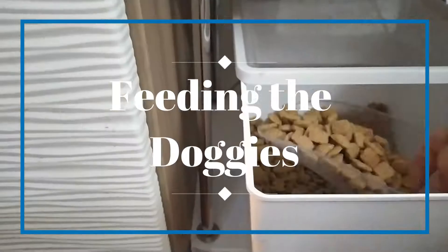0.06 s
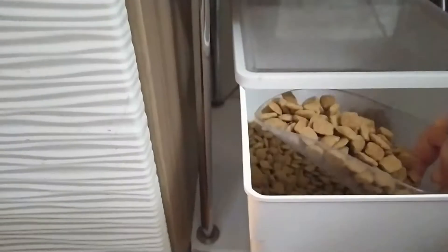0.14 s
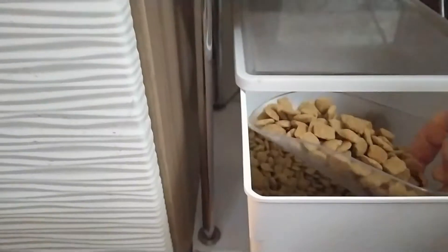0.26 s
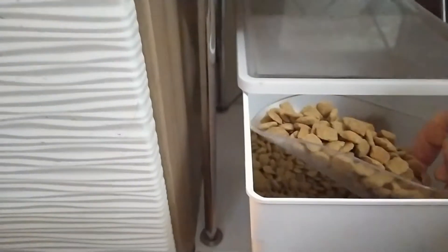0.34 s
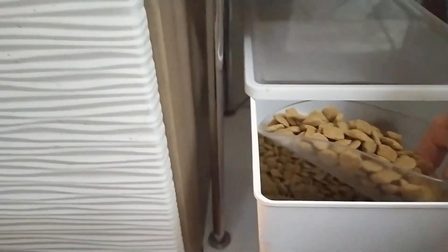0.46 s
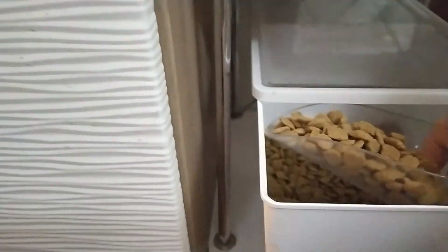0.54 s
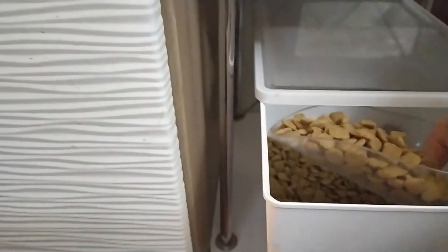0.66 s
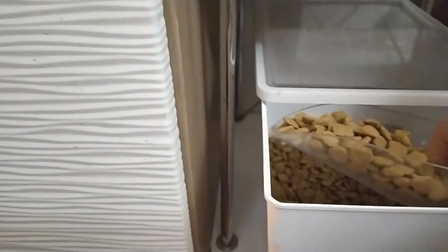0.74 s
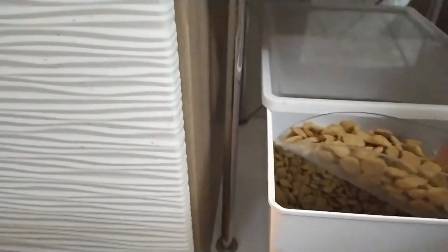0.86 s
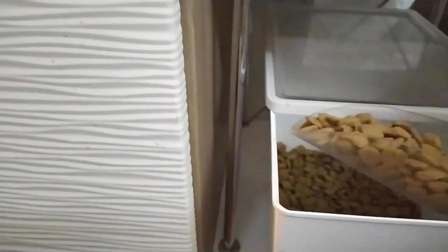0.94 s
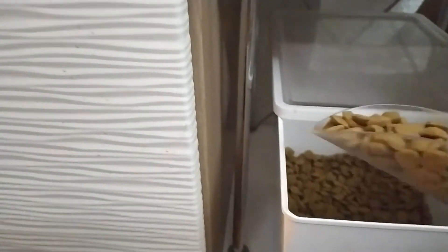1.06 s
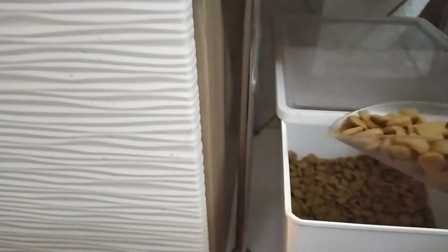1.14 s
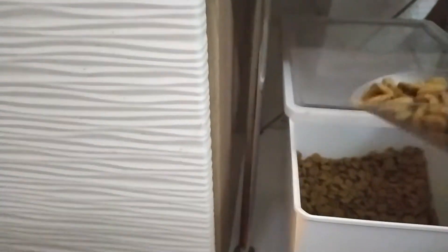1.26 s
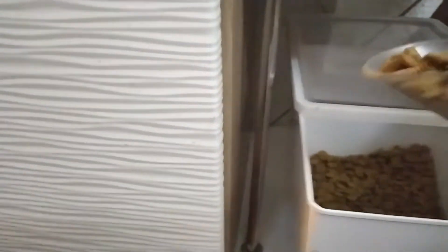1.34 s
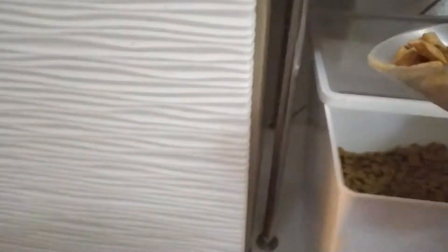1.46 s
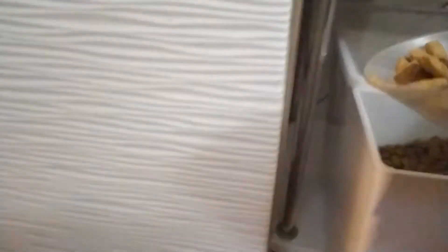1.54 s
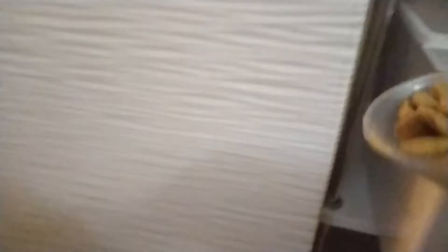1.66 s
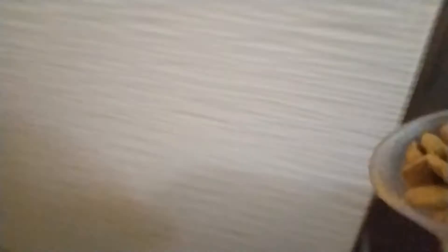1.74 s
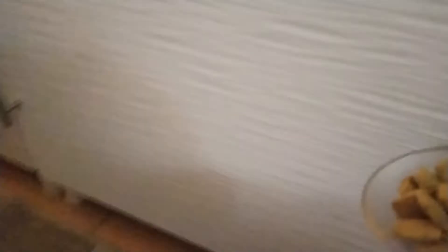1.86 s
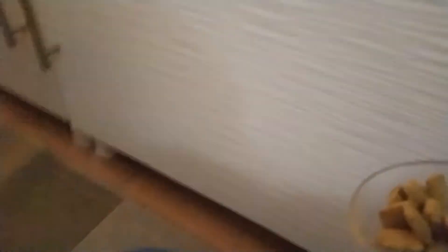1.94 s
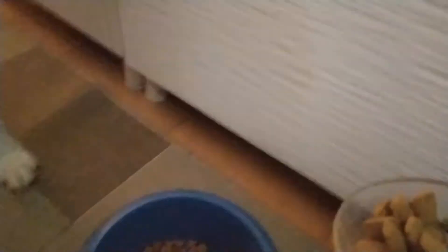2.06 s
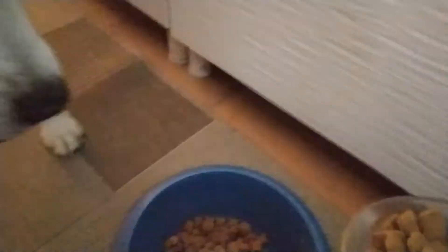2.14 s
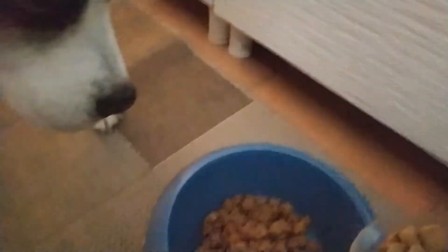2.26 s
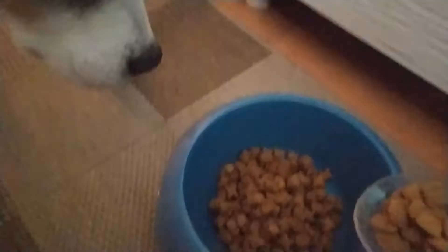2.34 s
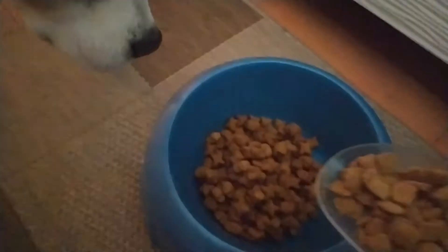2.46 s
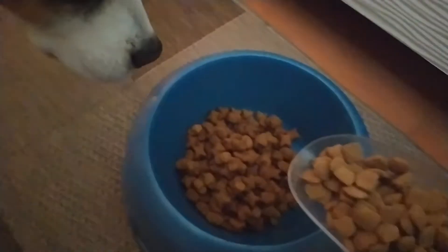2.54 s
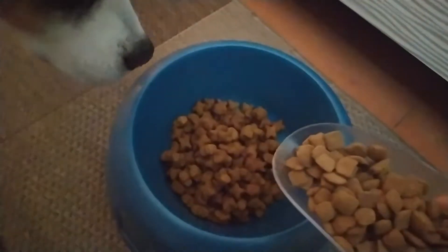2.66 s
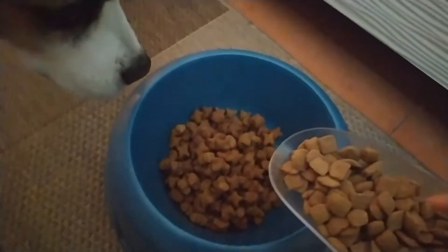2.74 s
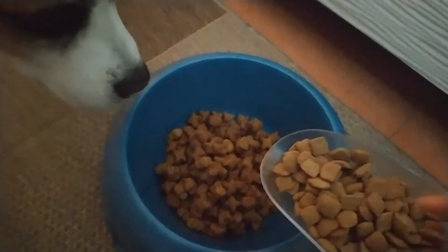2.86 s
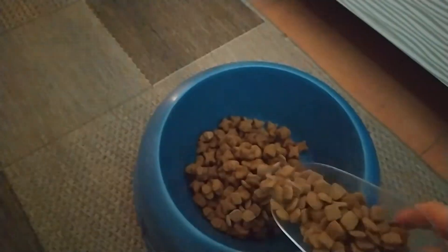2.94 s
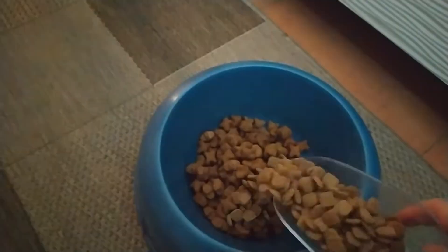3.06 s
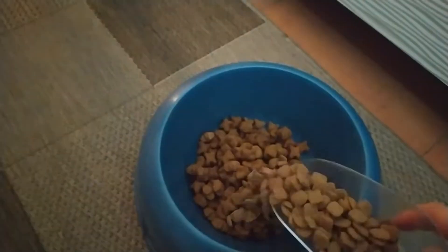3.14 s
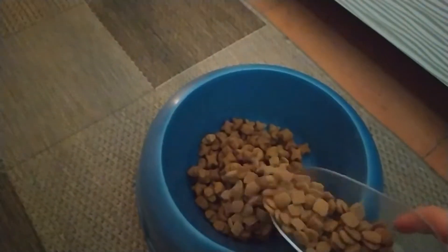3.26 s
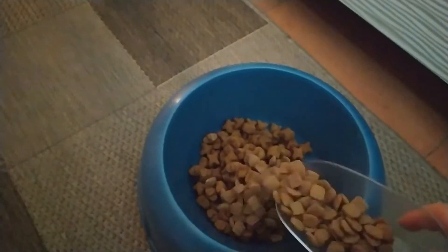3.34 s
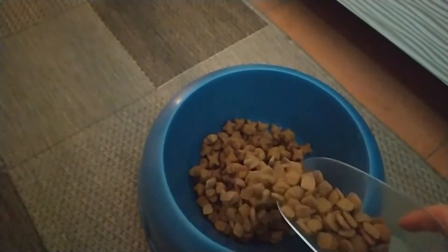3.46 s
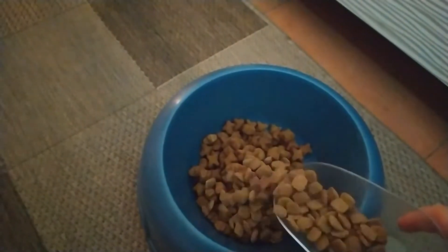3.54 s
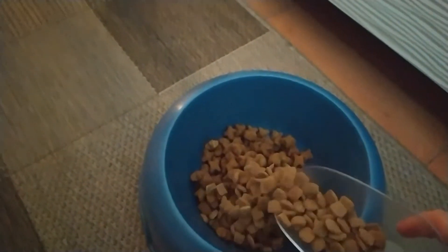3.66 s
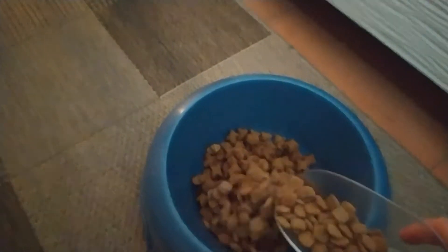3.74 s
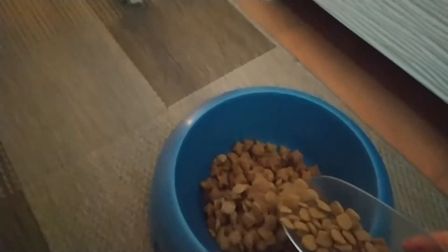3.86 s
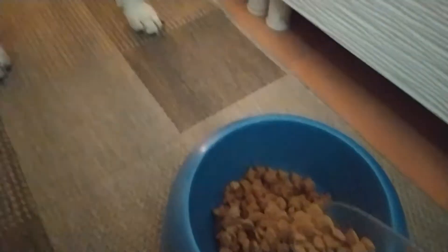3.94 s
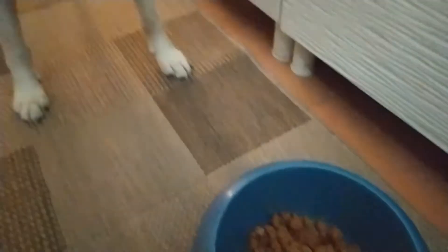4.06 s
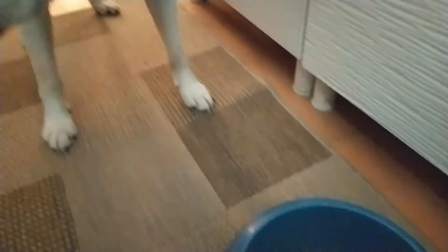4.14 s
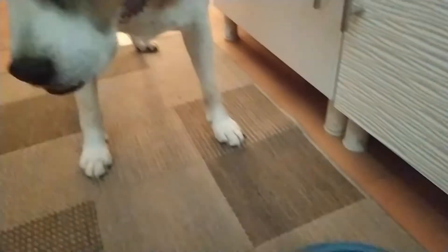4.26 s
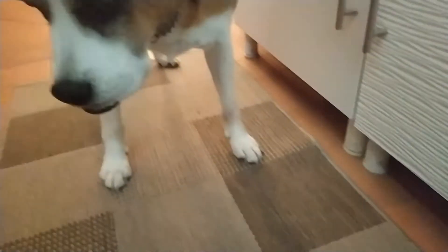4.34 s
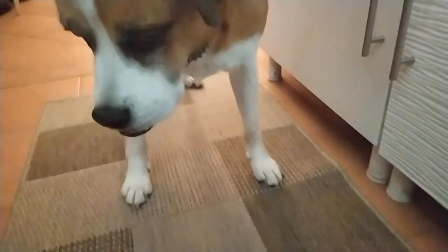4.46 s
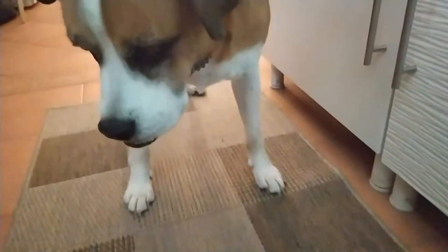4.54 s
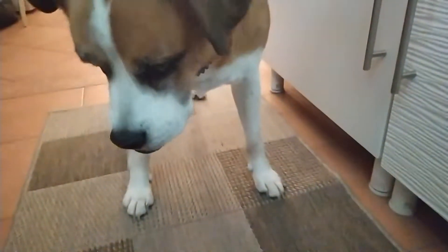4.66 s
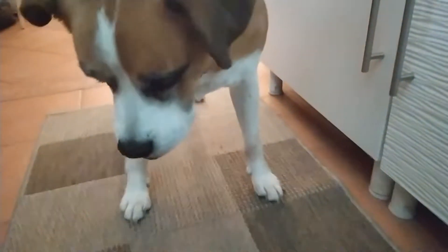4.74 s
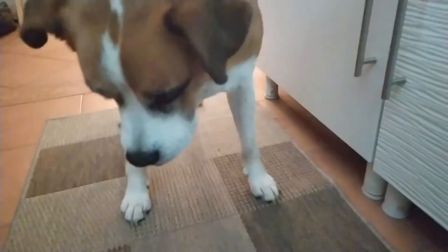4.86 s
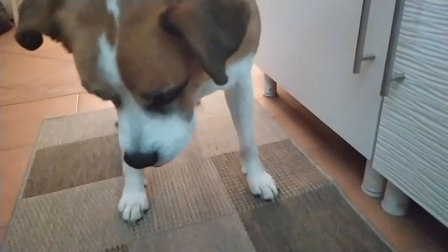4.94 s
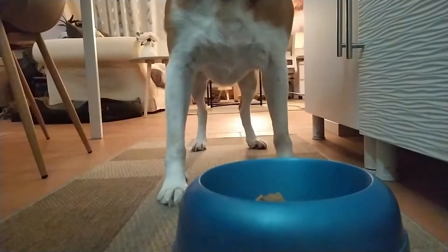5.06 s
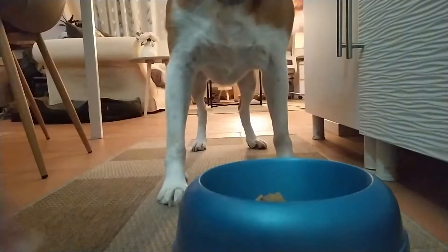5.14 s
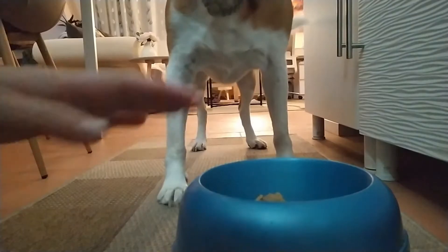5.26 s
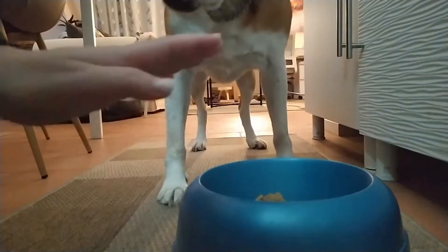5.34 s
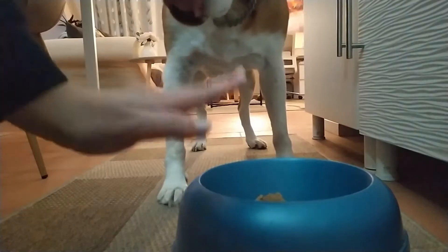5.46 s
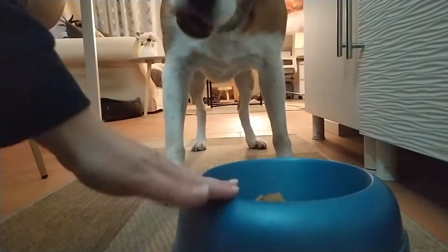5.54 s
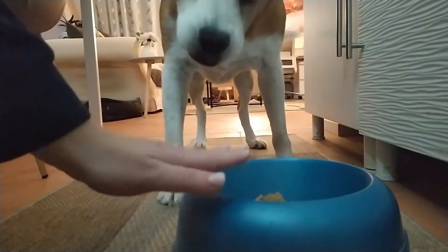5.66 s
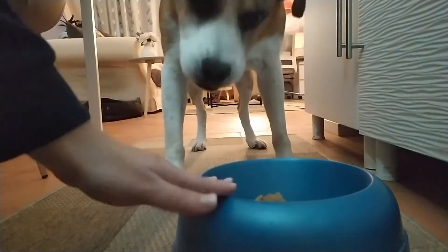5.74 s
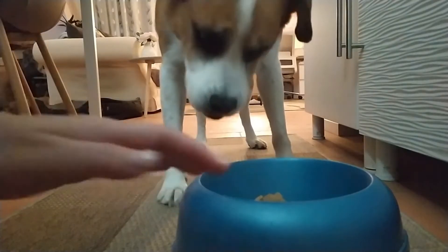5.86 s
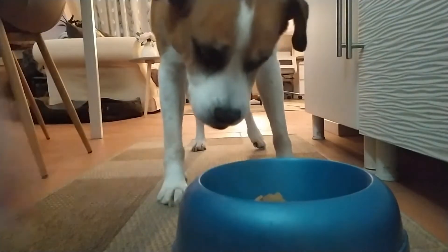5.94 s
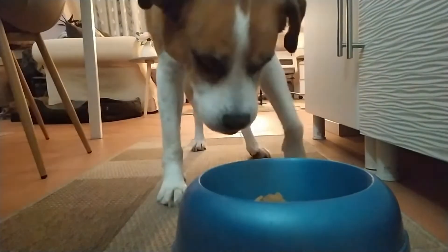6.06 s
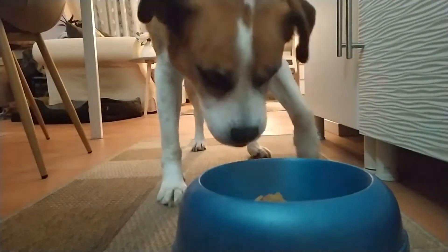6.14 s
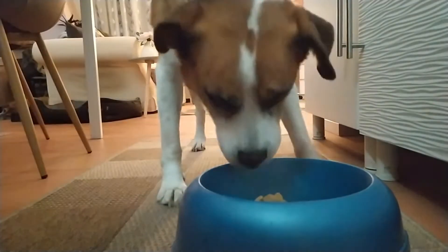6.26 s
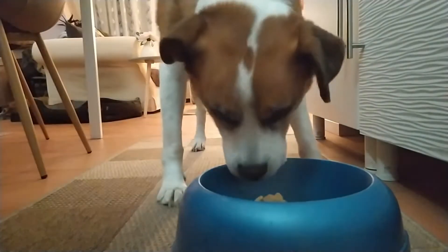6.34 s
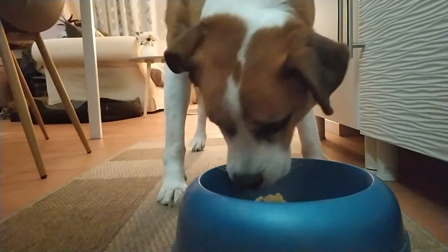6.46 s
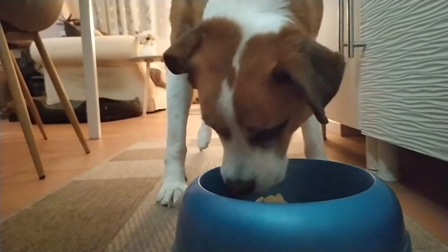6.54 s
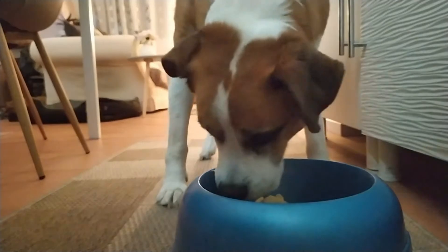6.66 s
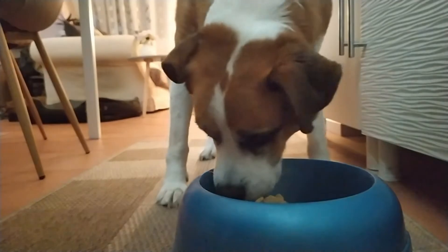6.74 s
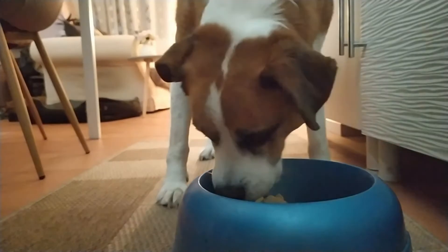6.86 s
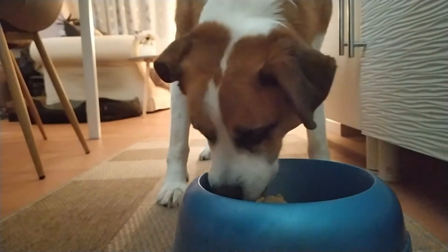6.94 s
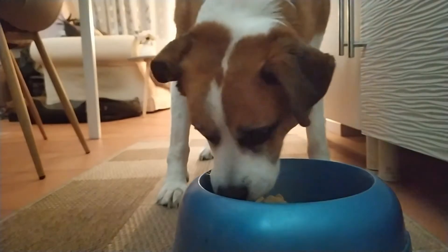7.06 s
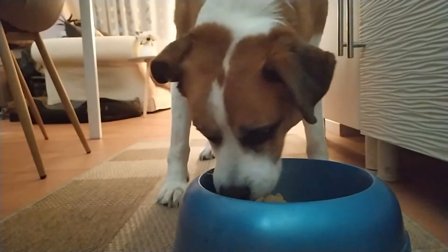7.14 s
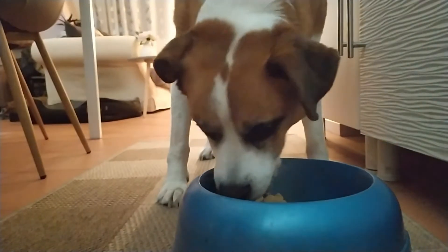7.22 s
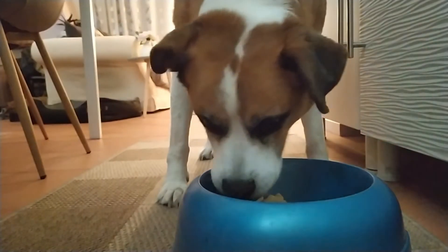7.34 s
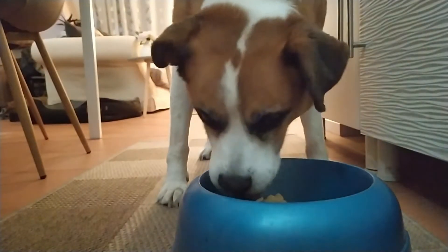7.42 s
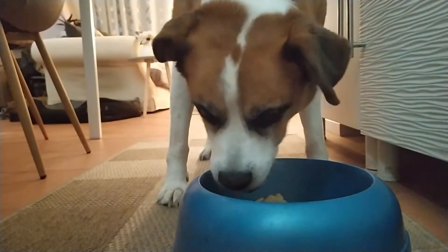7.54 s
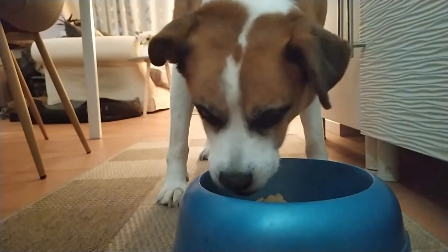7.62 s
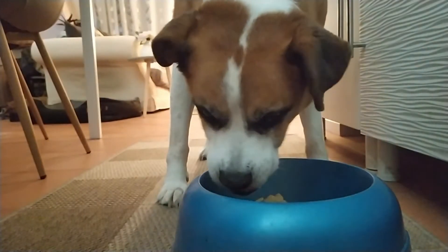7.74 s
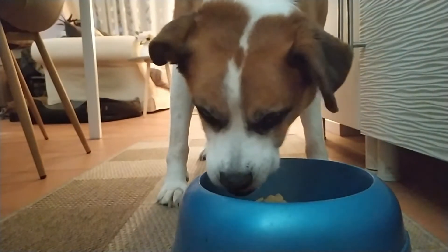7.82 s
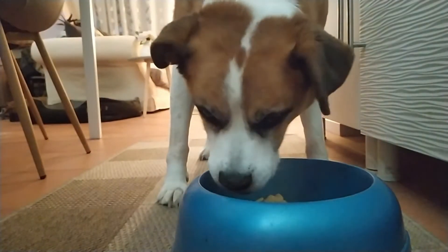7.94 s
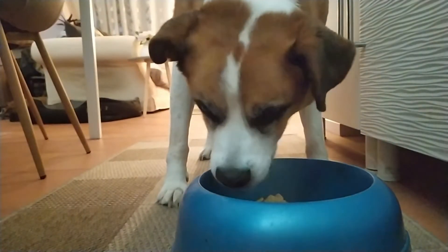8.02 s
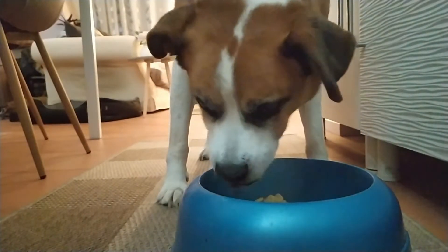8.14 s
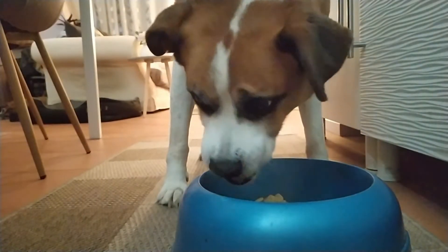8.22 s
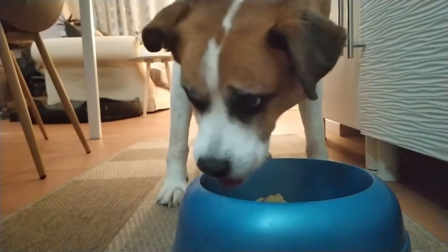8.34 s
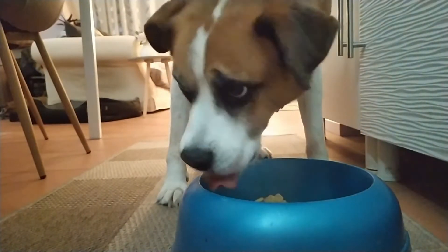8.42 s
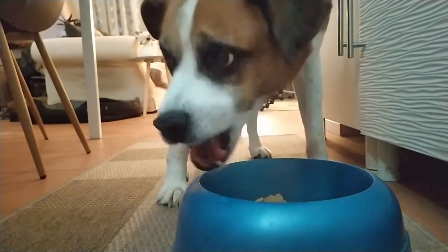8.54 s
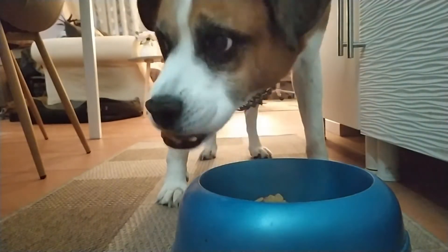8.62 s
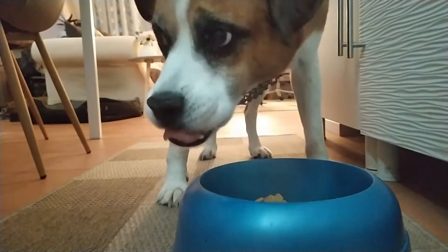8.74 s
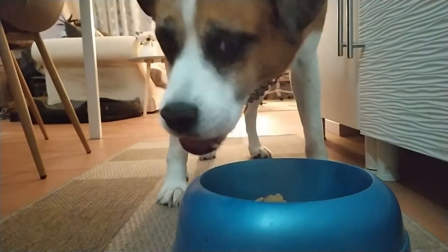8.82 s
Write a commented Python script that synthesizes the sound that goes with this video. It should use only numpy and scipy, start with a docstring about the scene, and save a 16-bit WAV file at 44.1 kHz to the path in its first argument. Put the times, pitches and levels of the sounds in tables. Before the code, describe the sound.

A quiet small kitchen, heard closely in stereo, with faint air and a low mains hum. From 0 to 0.4 s a hollow plastic bin judders, groans and thumps, with hard clacks near 0.15 and 0.3; softer knocks follow, then a scrape, low groan and firm double thud around 0.95, ending by 1.1. Faint rubbing and shifting pieces lead to a crisp double tick on the rim at 2.73. From 3.0 to 4.0 dry kibble slides and clicks in irregular bursts, bright scoop rattle over dull landings, last stray pieces by 4.2. Near quiet, slight rustles around 5. Two hollow bowl pats at 5.64 and 5.8, the second louder. A short whistling sniff at 6.1, muzzle bumps at 6.55, then licking, smacks and brittle crunches, strongest at 7.1 and 7.83, with a tiny collar clink at 7.1. Sparse chewing and small ticks fade toward 8.8.

```python
"""Dry kibble is tipped from a scoop into a plastic bowl and eaten by a dog: bursts of micro-impacts excite each body.
Before the pour, the scoop knocks about in a hollow plastic bin, a set of decaying modes struck and rubbed.
After it, a hand pats the bowl twice, in modal synthesis again; the dog sniffs in filtered noise,
then noses, licks and crunches in bursts, ringing tones and a patter of pellets.
Friction noise, collar clinks, faint room air and a mains hum complete the small kitchen, heard from a hand-held camera."""
import sys
import numpy as np
from scipy import signal
from scipy.fft import rfft, irfft, next_fast_len
from scipy.io import wavfile
from scipy.ndimage import uniform_filter1d

SR = 44100
rng = np.random.default_rng(int(sys.argv[2]) if len(sys.argv) > 2 else 0)


def master_out(mix):
    """Clip the mix to full scale and print it as 16-bit PCM to the path in sys.argv[1]."""
    frames = np.transpose(np.atleast_2d(mix))
    ceiling = np.clip(frames, -1, 1)
    pcm = np.round(ceiling * 32767).astype(np.int16)
    wavfile.write(sys.argv[1], SR, pcm)


N = 392049  # samples

# room air spectrum: frequency_hz, level_db (per Hz)
FLOOR = [(20, -19.5), (40, -8.5), (60, 5), (110, -4.5), (170, -8.5), (400, -10), (750, -15), (1300, -18.5),
         (2500, -22), (8000, -21), (16000, -24.5)]
FLOOR_DB = -68
# partials of the hum: pitch_hz, level_db
HUM = [(49, -69), (98, -78), (147, -100)]
# decay of the room: frequency_hz, t60_s
ROOM = [(100, 0.41), (320, 0.48), (600, 0.36), (1200, 0.38), (3000, 0.33), (8000, 0.27), (13000, 0.33),
        (16000, 0.26)]
# likeness of the two microphone ports: frequency_hz, coherence (0 to 1)
COHERENCE = [(100, 0.83), (500, 0.75), (1100, 0.26), (3000, 0.11), (16000, 0.084)]
# tilt between the ports: frequency_hz, left_minus_right_db
BALANCE = [(100, 1), (700, 0), (1500, 1), (5000, 0.5), (12000, 2.5)]
EDGE_HZ = 16200  # upper band limit

# scoop, sleeve and muzzle rubbing: start_s, end_s, level_db, fade_s
RUBS = [(0.0, 0.11, -61.5, 0.083), (.3, 2.5, -72, .12), (.88, 0.95, -58.5, 0.022),
        (1.41, 1.455, -64, 0.022), (1.9, 2.25, -72, 0.13), (2.03, 2.075, -65, .02), (2.15, 2.2, -64, .03),
        (4.91, 5.05, -66, 0.03), (5.37, 5.41, -67, .025), (5.56, 5.62, -63.5, .03), (5.3, 8.88, -69, 0.15),
        (6.55, 8.42, -68.5, 0.08), (8.6, 8.64, -66, .025), (8.76, 8.88, -73, .05)]
# friction spectrum: frequency_hz, level_db (per Hz)
RUB = [(100, 1.5), (700, 0), (1500, -1), (3000, -0.5), (5000, 0.5), (9000, 5), (12000, 1), (16000, -10)]
# hollow resonance of a cavity: frequency_hz, level_db (per Hz)
CAVITY = [(100, -45.5), (380, -15.5), (590, -4), (760, 0.5), (950, -11), (1300, -15.5), (2500, -25.5),
          (16000, -18)]
# hollow rustle on the way to the bowl: start_s, end_s
CARRY_SPAN_S = (2.05, 2.3)
CARRY_DB, CARRY_RISE_S, CARRY_FALL_S = -68.5, 0.33, 0.18
# pieces shifting in the carried scoop: start_s, level_db, brightness_db
SHIFTS = [(1.648, -62, -3), (1.708, -69, -5), (2.178, -57.5, -20), (2.305, -64, -6)]
SHIFT_S = 0.0026

# clinks of the collar: start_s, level_db, pitch_hz
CLINKS = [(2.014, -60, 7640), (5.719, -59, 6900), (7.103, -43, 9650), (7.968, -59, 7600)]
CLINK_T60_S = 0.026

# the sniff over the bowl: start_s, end_s
SNIFF_SPAN_S = (6.11, 6.18)
SNIFF_DB, SNIFF_RISE_S, SNIFF_FALL_S = -57, 0.083, 0.027
HISS_DB, HISS_LAG_S = -59.5, 0.041
# spectra of the nostril whistle and the hiss above it: frequency_hz, level_db (per Hz)
NOSTRILS = [(300, -26), (800, -15), (1300, -11), (1550, -32), (1970, -10), (2200, -27), (2500, -1),
            (2780, -2), (3000, -12), (3260, -23), (3550, -8), (4700, -4.5), (5250, -15), (6000, -3.5),
            (6800, -16), (16000, -42)]
NOSE_HISS = [(3000, -40), (6700, -18), (7300, 3), (8500, -6), (9400, -9), (11000, -3), (12800, -5),
             (16000, -12)]

# smacks of tongue and lips: start_s, level_db, pitch_hz (of the mouth), length_s
SMACKS = [(6.83, -56.5, 650, .007), (7.056, -52.5, 784, 0.0064), (7.28, -59, 774, 0.0087),
          (7.321, -53.5, 810, 0.0084), (7.353, -57, 710, 0.0046), (7.481, -60, 530, 0.0047),
          (7.595, -61, 755, 0.0069), (7.64, -60, 830, .008), (7.679, -58, 660, 0.0049),
          (7.762, -52, 740, 0.0037), (7.831, -37, 603, 0.0034), (7.9, -51, 530, 0.0094),
          (8.24, -60.5, 730, 0.012), (8.272, -60, 746, .007), (8.583, -51.5, 592, 0.0043),
          (8.6305, -50, 1030, 0.00091)]
# the tongue works in the bowl: start_s, end_s
LAP_SPAN_S = (7.08, 8.05)
LAP_DB, LAP_RISE_S, LAP_FALL_S = -67.5, 0.43, 0.15
# the muzzle bumps the bowl: start_s, level_db, length_s
BUMPS = [(6.533, -45, 0.0038), (6.568, -44, 0.01), (7.307, -53.5, .01), (7.357, -52.5, 0.0067),
         (7.461, -56.5, .006), (7.597, -54, 0.0036), (7.682, -60.5, 0.0063), (7.828, -51.5, 0.0052),
         (8.022, -52, 0.014)]
# kibble cracks between the teeth: start_s, level_db, brightness_db, length_s
CRUNCHES = [(6.309, -55, -14, 0.0068), (6.566, -52, 1, 0.022), (6.597, -59.5, 4, 0.018),
            (6.873, -57.5, -2, 0.008), (7.101, -39, 2.5, 0.0035), (7.18, -48, -24, 0.0028),
            (7.326, -62, -15, 0.0066), (7.352, -56, -14, 0.005), (7.38, -63, -9, 0.005),
            (7.42, -46, -36, .0025), (7.443, -56, -24, 0.0037), (7.591, -54.5, -16, 0.0036),
            (7.685, -58.5, -9, 0.0022), (7.764, -48, -3.5, 0.0028), (7.833, -40.5, -5, 0.0028),
            (7.846, -47, -21, 0.003), (7.9, -46, -8, 0.0044), (7.908, -49.5, 4, 0.0026),
            (8.269, -58, 1, 0.006), (8.407, -57.5, 5.5, 0.0063), (8.622, -56.5, 0, 0.0049),
            (8.63, -55, -10, 0.0023)]
CRUMBS_DB, CRUMBS_S = -18, 0.012  # crumbling after each crack, relative to it, and its decay
# the jaws grind: start_s, end_s, level_db
CHEWS = [(7.32, 7.378, -64), (7.64, 7.644, -56.5), (8.022, 8.04, -55), (8.245, 8.317, -66.5),
         (8.38, 8.42, -61.5), (8.597, 8.66, -63)]
CHEW_FADE_S = 0.015
# pellets may sound while the dog eats: start_s, end_s
EATING_SPAN_S = (6.28, 8.88)
# light, dry ticks of teeth or claws: start_s, level_db
TICKS = [(5.388, -76), (5.472, -54.5), (5.718, -50), (7.968, -47.5), (8.339, -57), (8.7, -53.5)]
TICK_S = 0.0053
# spectra of a dull bump, a crunch and a sharp tick: frequency_hz, level_db (per Hz)
BUMP = [(30, -7), (90, 2.5), (170, -2.5), (330, 1), (500, -9.5), (2000, -80), (16000, -87)]
CRUNCH = [(300, -18), (700, -14), (1100, -9), (1700, -8.5), (2280, 2.5), (2800, -6.5), (4000, -6.5),
          (6000, -19), (16000, -41)]
TICK = [(300, -16), (2000, -15.5), (4500, -4), (5600, -1), (7000, -3), (8300, -1.5), (10500, -7),
        (12500, -13), (16000, -23)]

# pats on the bowl: start_s, level_db, contact_s (deviation of the push), place_hz (favoured), slap_db
PATS = [(5.641, -27.5, 0.00032, 530, -50.5), (5.804, -21.5, 0.0004, 231, -40.5)]
# modes of the bowl: pitch_hz, level_db, t60_s
BOWL = [(95, -36, 0.066), (132, -12, 0.13), (241, 12, 0.03), (321, 3.5, 0.06), (531, 12, 0.032),
        (710, 12, 0.03), (178, -3.5, 0.19), (267.5, -9, 0.32), (337.6, -11, 0.44), (391, -13, .27),
        (600, -14, 0.18), (747, -1, 0.16), (1160, 1.5, 0.11), (1320, -8, 0.1)]
# uneven radiation of the bowl to the ports: frequency_hz, left_minus_right_db, left_lead_rad
BOWL_SIDES = [(146, 0, -0.3), (232, -3, -0.27), (326, 12.5, 1), (516, -4.5, -0.26), (770, 8, 0.37)]
SEAT_S, SEAT_DB = 0.0044, -12.5  # the pressed bowl seats itself on the floor just after each pat
SHUDDER_DB, SHUDDER_S = -11.5, 0.022  # the bowl and its load shudder on the mat, relative to the pat
# shudder spectrum: frequency_hz, level_db (per Hz)
SHUDDER = [(50, -42), (100, -18), (170, -2), (340, 4), (450, -15.5), (750, -7.5), (950, -19), (1300, -12),
           (2500, -41), (16000, -80)]
# a faint hollow note as the camera goes down to the floor: start_s, pitch_hz, level_db, t60_s
NOTE = (5.111, 262, -57, .33)

# knocks on the bin: start_s, air_db, air_hz (favoured), panel_db, panel_hz, contact_s
THUDS = [(0.003, -46, 82, -65, 260, 0.0028), (0.046, -46, 78, -52, 259, 0.003),
         (0.306, -46.5, 144, -44.5, 266.7, 0.0027), (0.372, -49, 148, -46.5, 255.4, 0.0025),
         (0.567, -51, 151, -53, 296, 0.0024), (0.589, -45.5, 155, -48, 234, 0.0027),
         (0.787, -51, 109, -48.5, 256, 0.0023), (0.937, -41.5, 120, -36, 237.4, 0.0013),
         (0.966, -40, 112, -37.5, 292.5, 0.001), (1.047, -43.5, 125, -47, 275.6, 0.0028),
         (1.11, -52, 140, -58, 257, 0.0044)]
# modes of the enclosed air and of the walls: pitch_hz, level_db, t60_s
BIN_AIR = [(64.6, -6, 0.48), (80.2, 1.5, 0.32), (130, 0, 0.24), (150.8, -5.5, 0.56), (184, -9.5, 0.29)]
BIN_WALLS = [(232.4, -3.5, 0.19), (295.5, -9, 0.4), (344, -4.5, 0.12), (434, -9.5, 0.14), (488, -6.5, 0.14),
             (560, -12.5, 0.14), (661, -4.5, 0.07), (768, -9, 0.062), (885, -5.5, 0.058),
             (1230, -17.5, 0.08)]
# a firm knock stirs the other walls too; they lose SOFTEN_DB per doubling of contact time
FIRM_S, WALLS_DB, SOFTEN_DB = 0.0018, -8, 3.5
PANEL_T60_S, PLACE_DB = 0.19, 9.5  # panel ring; loss of air modes per octave from the favoured pitch
# groans of a wall: start_s, end_s, level_db, pitch_hz
GROANS = [(0.001, 0.096, -47, 268.7), (0.131, 0.175, -48.5, 264), (0.941, 0.977, -33, 279)]
GROAN_SAG = 0.072  # share by which the pitch falls as the pressure eases
# lid and scoop clacking on the rim: start_s, level_db, brightness_db
CLACKS = [(0.105, -48.5, -30), (0.118, -42.5, -27), (0.147, -39, -1), (0.3063, -31.5, -7), (0.324, -50, 11),
          (0.799, -50, -1), (0.882, -58, 0), (0.902, -59, 7), (0.94, -49.5, -9), (.951, -48, -10),
          (0.972, -58.5, 9), (1.075, -61.5, 6)]
CLACK_S, SNAP_S, SNAP_DB = 0.0055, 0.00052, -7.5  # a clack is a hard snap and a short chatter
# clack spectrum: frequency_hz, level_db (per Hz)
CLACK = [(150, -8.5), (350, -10), (670, -6), (1000, -10.5), (1240, -3.5), (1600, -10), (2700, -12),
         (5000, -18), (16000, -60)]
# lid and scoop dragging on the bin: start_s, end_s, judder_db, scrape_db
DRAGS = [(0.0, 0.096, -49.5, -67), (0.898, 0.972, -45.5, -53)]
DRAG_RISE_S, DRAG_FALL_S = 0.036, 0.023

# the scoop is held tipped over the bowl: start_s, end_s
POUR_SPAN_S = (3.08, 3.94)
# pieces may fall: start_s, end_s
FALLING_SPAN_S = (2.99, 4.3)
POUR_DB, POUR_RISE_S, POUR_FALL_S = -49, 0.072, 0.13
# small avalanches off the scoop: start_s, level_db, length_s
SLIPS = [(2.994, -42.5, 0.016), (3.0312, -34.5, 0.003), (3.161, -39, 0.019), (3.184, -29.5, 0.0064),
         (3.1916, -28.5, 0.0036), (3.221, -36.5, 0.028), (3.311, -35.5, 0.0025), (3.331, -31.5, 0.016),
         (3.462, -32, 0.0068), (3.496, -24.5, 0.0033), (3.514, -40.5, 0.004), (3.552, -48, 0.013),
         (3.606, -36, 0.0034), (3.6585, -32.5, 0.0016), (3.787, -41.5, 0.029)]
SLIP_RING_DB = -5.5  # scoop colour in each avalanche, relative to its ticks
STIR_DB, SETTLE_S = -12, 0.13  # an avalanche leaves pieces rattling, and they settle
# single pieces striking the scoop wall: start_s, level_db, brightness_db, length_s
DROPS = [(3.053, -55, 15, 0.015), (3.218, -42, -3, 0.0019), (3.226, -42, -1, 0.0025),
         (3.256, -43.5, 1, 0.0017), (3.32, -36, 2, 0.0072), (3.378, -48, -1, 0.0024),
         (3.384, -56, 8, 0.0011), (3.406, -30.5, -5, 0.0022), (3.419, -51, 14.5, 0.0028),
         (3.473, -43, -5, 0.002), (3.485, -43, 3, 0.002), (3.489, -32.5, 6, 0.001),
         (3.536, -56.5, 8.5, 0.0015), (3.642, -34, 3.5, 0.0026), (3.669, -27.5, -9, 0.0017),
         (3.676, -34, -4.5, 0.0018), (3.685, -51, 5, 0.0012), (3.796, -38, -19.5, 0.0016),
         (3.826, -50, 1, 0.00072), (3.862, -55.5, 6, 0.0007), (3.871, -54, 10.5, 0.00058),
         (3.9, -41, -9.5, 0.0013), (3.922, -43, -12.5, 0.00068), (3.93, -28.5, -14.5, 0.0013),
         (3.9446, -37, -12, 0.0012), (3.955, -44, -13, .0015), (3.972, -52, 11, 0.00099),
         (3.9805, -60.5, 12, 0.00086), (4.0155, -29.5, -18.5, 0.0014), (4.03, -43, -7, 0.002),
         (4.2207, -45, -3.5, 0.0012)]
LANDING_DB = -20  # the heap thuds under each piece, relative to it
# the scoop taps the bowl's rim, twice in one touch: start_s, scoop_db, tick_db, length_s
RIM_TAPS = [(2.7288, -41.5, -22.5, 0.00051), (2.7311, -36.5, -26.5, 0.00071)]
# modes of the scoop wall: pitch_hz, level_db, t60_s
SCOOP_MODES = [(2040, 4, 0.078), (2240, 1, 0.049), (2420, -2, 0.072), (2544, -1, 0.052), (2750, 3, 0.057),
               (3186, 1, 0.055), (3350, -5.5, 0.05), (3500, -10.5, 0.04), (4120, 7, 0.14), (4630, -7, .05),
               (5420, -6, 0.04), (6170, -0.5, 0.04), (7058, -2, 0.058)]
# spectra of the scoop, the tapped rim and the heap in the bowl: frequency_hz, level_db (per Hz)
SCOOP = [(200, -34.5), (900, -18), (1650, -15.5), (2080, -4), (2400, 1), (2950, -4), (3300, 0),
         (3750, -5.5), (4700, -9), (6000, -24), (16000, -42)]
RIM = [(300, -24), (2000, -11.5), (4500, -5), (5700, 5.5), (7000, -2), (8500, 0.5), (10700, -3.5),
       (12000, -8.5), (13700, -10), (15000, -9.5), (16000, -6)]
HEAP = [(50, -53), (95, -25.5), (150, -3.5), (230, -5.5), (325, 8), (400, -4.5), (540, -19), (690, -3.5),
        (1000, -7), (1400, -15), (3000, -22.5), (16000, -73.5)]


def amp(db):
    """Level law: decibels to linear gain."""
    return 10 ** (np.asarray(db) / 20)


def evened(x):
    """Power normalisation: scales to rms 1."""
    return x / np.sqrt(np.mean(x ** 2) + 1e-20)


def read(points, hz):
    """Interpolation of a spectrum on a log-frequency axis."""
    f, value = np.transpose(points)
    return np.interp(np.log(hz + 1), np.log(f + 1), value)


def add(mix, s, sound):
    """Superposition: mixes a sound in at time s."""
    part = mix[:, max(round(s * SR), 0):][:, :sound.shape[-1]]
    part += sound[..., :part.shape[1]]


def smoothed_noise(count, size, second_size):
    """Random fluctuation: noise averaged twice and scaled to rms 1."""
    once = uniform_filter1d(rng.standard_normal(count), size=size)
    return evened(uniform_filter1d(once, size=second_size))


def coloured(x, spectrum, ripple_db=0, size=4096):
    """Causality: a minimum-phase body rings only after it is struck; ripple gives it chance resonances."""
    ripple = ripple_db * smoothed_noise(size // 2 + 1, 44, 30)
    level_db = read(spectrum, np.fft.rfftfreq(size, 1 / SR)) + ripple
    cepstrum = irfft(np.log(amp(level_db)))
    # folding the cepstrum onto positive times makes the filter minimum-phase
    cepstrum[1:size // 2] *= 2
    cepstrum[size // 2 + 1:] = 0
    response = irfft(np.exp(rfft(cepstrum)))
    return signal.oaconvolve(x, response[None], axes=1)[:, :x.shape[1]]


def ports(x, lag=.00004):
    """Coherence of a microphone pair: alike in the bass, the right port early by lag seconds."""
    size = next_fast_len(N)
    hz = np.fft.rfftfreq(size, 1 / SR)
    a, b = rfft(x, size)
    same = np.clip(read(COHERENCE, hz), 0, 1)
    lean = amp(read(BALANCE, hz) / 2)
    right = (same * a + np.sqrt(1 - same ** 2) * b) * np.exp(2j * np.pi * hz * lag)
    return irfft(np.array([a * lean, right / lean]), size)[:, :N]


def room(x, wet_db, size=20):
    """Reverberation: sparse reflections, one per size samples on average, each band dying at its own speed."""
    t = np.arange(SR) / SR
    present = rng.random((2, SR)) < 1 / size
    taps = rng.choice([-1., 1.], (2, SR)) * present * (t > .004)
    hz, t, z = signal.stft(taps, SR, nperseg=256)
    same = np.clip(read(COHERENCE, hz), 0, 1)[:, None]
    z[1] = same * z[0] + np.sqrt(1 - same ** 2) * z[1]
    decay = amp(-60 * t / read(ROOM, hz)[:, None])
    tail = signal.istft(z * decay, SR, nperseg=256)[1]
    tail /= np.linalg.norm(tail[0])
    return x + amp(wet_db) * signal.fftconvolve(x, tail, axes=1)[:, :N]


def grains(per_s, spread_db):
    """Shot noise: a patter of tiny impacts at random times, a few of them large."""
    size = amp(spread_db * np.minimum(rng.exponential(1, N), 4))
    size = size * (rng.random(N) < per_s / SR)
    return size * rng.standard_normal((2, N))


def catching(depth_db, size=700):
    """Irregular friction: the gain wanders as things catch and let go, more slowly for a larger size."""
    return amp(depth_db * smoothed_noise(N, size, size // 2))


def swell(start, end, db, rise, fall):
    """Envelope of a gesture: it builds up to start, holds until end, and dies away."""
    t = np.arange(N) / SR
    building = (np.minimum(t - start, 0) / rise) ** 2
    dying = np.maximum(t - end, 0) / fall
    return amp(db) * np.exp(-building - dying)


def cracks(rows, colours, trims_db, ragged_db, ripple_db, rise=0.12, size=6000, count=24):
    """Fracture noise: each event is a ragged burst, in steps of count samples, exciting several bodies at once."""
    out, t = np.zeros((2, N)), np.arange(size) / SR
    for s, *levels_db, length in rows:
        run = np.exp(-t / (2 * length)) * (1 - np.exp(-t / (rise * length)))
        run *= amp(ragged_db * np.repeat(rng.uniform(-1.6, 1.6, size), count)[:size])
        for db, trim_db, colour in zip(levels_db, trims_db, colours):
            sound = coloured(run * rng.standard_normal((2, size)), colour, ripple_db)
            # equal energy whatever the length: that of rms 1 over 10 ms
            sound *= np.sqrt(.01 * SR) / np.linalg.norm(sound, axis=1, keepdims=True)
            add(out, s, amp(db + trim_db) * sound)
    return ports(out)


def ring(modes, contact, size=SR):
    """Modal vibration: a blow swells the modes over its contact time in s, with random phases for each blow."""
    t = np.arange(size) / SR
    sound = np.zeros(size)
    for hz, db, t60 in modes:
        sound += amp(db - 60 * t / t60) * np.sin(2 * np.pi * (hz * t + rng.random()))
    sound *= 1 - np.exp(-(t / contact) ** 2)
    return sound / np.sqrt(np.mean(sound[t < .04] ** 2))


def resonated(x, modes):
    """Linear resonance: convolution with a modal response of unit energy."""
    return signal.oaconvolve(x, modes[None] / np.linalg.norm(modes), axes=1)[:, :N]


def pellets(span, low_hz, high_hz, ring_s, spread_db, count, overtone=1.5, size=1200):
    """Random collisions: each piece rings briefly at its own pitch and meets each port at its own phase."""
    out, t, (start, end) = np.zeros((2, N)), np.arange(size) / SR, span
    knock = np.exp(-t / ring_s) * (1 - np.exp(-10 * t / ring_s))
    for when, pitch, weakness, left, right in rng.random((count, 5)):
        hz = low_hz * (high_hz / low_hz) ** pitch
        phase = 2 * np.pi * (hz * t + np.array([[left], [right]]))
        tone = np.sin(phase) + .5 * np.sin(overtone * phase)
        add(out, start + when * (end - start), amp(-spread_db * weakness) * knock * tone)
    return evened(out) * np.sqrt((end - start) * SR / N)  # rms 1 over the span


def background():
    """Stationary noise and harmonic tones: quiet room air and the hum of an appliance."""
    t = np.arange(N) / SR
    hum = sum(amp(db) * np.sqrt(2) * np.sin(2 * np.pi * (hz * t + rng.random())) for hz, db in HUM)
    air = evened(coloured(rng.standard_normal((2, N)), FLOOR))
    return hum + amp(FLOOR_DB) * ports(air)


def rubbing():
    """Dry friction: patches of scoop, cloth and fur, each with its own tone, catch in turn."""
    texture = np.zeros((2, N))
    for _ in range(4):
        patch = grains(per_s=2700, spread_db=2.4) * catching(depth_db=2.5, size=2600)
        texture += evened(coloured(patch, RUB, ripple_db=3.5))
    strokes = sum(swell(start, end, db, fade, fade) for start, end, db, fade in RUBS)
    rustle = grains(per_s=2700, spread_db=4.0) * catching(depth_db=3.0, size=1400)
    hollow = evened(coloured(rustle, CAVITY))
    carry = swell(*CARRY_SPAN_S, CARRY_DB, CARRY_RISE_S, CARRY_FALL_S)
    return ports(amp(2.0) * evened(texture) * strokes + hollow * carry)


def clinking():
    """Modal ringing of small links: the collar touches and rings briefly, high up, in two partials."""
    out = np.zeros((2, N))
    for s, db, hz in CLINKS:
        modes = [(hz, 0, CLINK_T60_S), (1.11 * hz, -8, CLINK_T60_S)]
        clink = np.array([ring(modes, contact=.0004, size=4000) for _ in out])  # own phases at each port
        add(out, s, amp(db) * clink)
    return room(out, wet_db=-13)


def carrying():
    """Impacts in a cavity: pieces shift in the scoop on the way to the bowl."""
    rows = [(s, db, db + bright, SHIFT_S) for s, db, bright in SHIFTS]
    shifts = cracks(rows, [CAVITY, SCOOP], trims_db=[-.5, -.5], ragged_db=2.5, ripple_db=3.5)
    return room(shifts, wet_db=-12.0)


def sniffing():
    """Turbulent flow through resonances: air whistles in the dog's nostrils, and a higher hiss follows."""
    whistle = evened(coloured(rng.standard_normal((2, N)), NOSTRILS))
    whistle *= swell(*SNIFF_SPAN_S, SNIFF_DB, SNIFF_RISE_S, SNIFF_FALL_S)
    hiss = evened(coloured(rng.standard_normal((2, N)), NOSE_HISS, ripple_db=-1.0))
    hiss *= swell(*np.add(SNIFF_SPAN_S, HISS_LAG_S), HISS_DB, SNIFF_RISE_S, SNIFF_FALL_S)
    return room(ports(whistle + hiss), wet_db=-2.0)


def smacking():
    """Cavity resonance: each smack of tongue and lips rings the mouth at the pitch of its opening."""
    rows = [(s, db, db, db, length) for s, db, _, length in SMACKS]
    smacks = cracks(rows, [BUMP, CAVITY, CRUNCH], trims_db=[-12, -2.5, -11],
                    ragged_db=4.0, ripple_db=3.5, rise=0.4)
    for s, db, hz, length in SMACKS:
        mouth = ring([(hz, 0, .04), (0.916 * hz, -7, .03)], contact=length / 2, size=4000)
        add(smacks, s, amp(db - 9.5) * mouth)
    return smacks


def licking():
    """Random collisions and film crackle: around the smacks, wet lips crackle and loose pieces are nudged."""
    licks = pellets(EATING_SPAN_S, low_hz=450, high_hz=1100, ring_s=.005, spread_db=16, count=200)
    wet = grains(per_s=300, spread_db=1.5) * catching(depth_db=5, size=1400)
    crackle = evened(coloured(wet, CRUNCH, ripple_db=2))
    nudges = evened(coloured(grains(per_s=130, spread_db=3.5), HEAP))
    working = ports(amp(-1) * licks + amp(-7.0) * crackle + amp(-5) * nudges)
    working *= swell(*LAP_SPAN_S, LAP_DB, LAP_RISE_S, LAP_FALL_S)
    return room(smacking() + working, wet_db=-11.5)


def biting():
    """Brittle fracture: teeth crack the kibble, each crack sheds crumbs, jaws grind, and the muzzle bumps."""
    rows = [(s, db, db, length) for s, db, length in BUMPS]
    bumps = cracks(rows, [BUMP, CAVITY], trims_db=[-1.5, -8], ragged_db=6.5, ripple_db=2, rise=0.073)
    rows = [(s, db, db, db, db + bright, length) for s, db, bright, length in CRUNCHES]
    crunches = cracks(rows, [BUMP, CAVITY, CRUNCH, TICK], trims_db=[-16, -12, 0, .5],
                      ragged_db=3.5, ripple_db=2.0, rise=0.08, count=40)
    rows = [(s, db, db, TICK_S) for s, db in TICKS]
    ticks = cracks(rows, [CRUNCH, TICK], trims_db=[-13, -1.6], ragged_db=3.0, ripple_db=2, rise=0.1)
    crumbs = pellets(EATING_SPAN_S, low_hz=900, high_hz=4600, ring_s=.0009, spread_db=20, count=2600)
    shed = sum(swell(s + length, s + length, db + CRUMBS_DB, length, CRUMBS_S)
               for s, db, _, length in CRUNCHES)
    ground = sum(swell(start, end, db, CHEW_FADE_S, CHEW_FADE_S) for start, end, db in CHEWS)
    return room(bumps + crunches + ticks + ports(crumbs * (shed + ground)), wet_db=-9.0)


def bowl_modes(place_hz):
    """Modal radiation: all modes start together, weighted by the place of the blow, unequal at the ports."""
    t, sides = np.arange(SR) / SR, np.array(BOWL_SIDES)
    port = np.array([[.5], [-.5]])  # half of each difference to the left, half to the right
    modes = np.zeros((2, SR))
    for hz, db, t60 in BOWL:
        decay = amp(db + port * read(sides[:, :2], hz) - 60 * t / t60)
        lead = port * read(sides[:, ::2], hz)
        weight = 1 / (1 + 0.64 * np.log(hz / place_hz) ** 2)
        modes += weight * decay * np.cos(2 * np.pi * hz * t + lead)
    return modes


def patting():
    """Impulse response to a soft push: the hand excites the bowl's modes; the skin adds a light slap."""
    out = np.zeros((2, N))
    for s, level_db, contact, place_hz, _ in PATS:
        push = signal.windows.gaussian(257, contact * SR)
        sound = signal.oaconvolve(bowl_modes(place_hz), push[None], axes=1)
        add(sound, SEAT_S, amp(SEAT_DB) * sound)
        onset_rms = np.sqrt(np.mean(sound[:, :SR // 60] ** 2))
        add(out, s - len(push) / 2 / SR, amp(level_db) * sound / onset_rms)
    rows = [(s + SEAT_S, slap_db, .007) for s, *_, slap_db in PATS]
    slaps = cracks(rows, [CRUNCH], trims_db=[-1.5], ragged_db=0.0, ripple_db=2.0)
    rows = [(s, db + SHUDDER_DB, SHUDDER_S) for s, db, *_ in PATS]
    out += cracks(rows, [SHUDDER], trims_db=[0], ragged_db=-1.5, ripple_db=6.0)
    s, hz, db, t60 = NOTE
    add(out, s, amp(db) * ring([(hz, 0, t60)], contact=0.0036))
    return room(out + slaps, wet_db=-12.5)


def bin_judder():
    """Driven resonance: dragging drives the bin's air and walls with a train of small impacts."""
    drag = sum(swell(start, end, db, DRAG_RISE_S, DRAG_FALL_S) for start, end, db, _ in DRAGS)
    modes = ring(BIN_AIR, contact=0.0029) + amp(3.0) * ring(BIN_WALLS, contact=0.00074)
    judder = evened(grains(per_s=430, spread_db=1.0)) * drag
    return amp(-1.0) * ports(resonated(judder, modes))


def bin_knocks():
    """Coupled modes: each knock booms the enclosed air, drums one panel and stirs the other walls."""
    out = np.zeros((2, N))
    for s, air_db, air_hz, panel_db, panel_hz, contact in THUDS:
        air = [(hz, db - PLACE_DB * abs(np.log2(hz / air_hz)), t60) for hz, db, t60 in BIN_AIR]
        wall_db = panel_db + WALLS_DB - SOFTEN_DB * np.log2(contact / FIRM_S)
        boom = amp(air_db) * ring(air, contact)
        panel = amp(panel_db) * ring([(panel_hz, 0, PANEL_T60_S)], contact)
        walls = amp(wall_db) * ring(BIN_WALLS, contact)
        add(out, s, boom + panel + walls)
    return out


def bin_groans():
    """Stick-slip friction: a wall groans at a falling pitch with uneven strength."""
    out = np.zeros((2, N))
    for start, end, db, hz in GROANS:
        pitch = hz * np.interp(np.arange(N) / SR, [start, end], [1, 1 - GROAN_SAG])
        tone = np.sqrt(2) * np.sin(2 * np.pi * np.cumsum(pitch) / SR)
        out += tone * swell(start, end, db, 0.0075, 0.0077) * catching(depth_db=0.5, size=300)
    return out


def rim_clacks():
    """Hard contact and sliding friction: lid and scoop snap, chatter and scrape on the rim."""
    scrape = ports(evened(coloured(grains(per_s=450, spread_db=3.0), CLACK)))
    scrape *= sum(swell(start, end, db, DRAG_RISE_S, DRAG_FALL_S) for start, end, _, db in DRAGS)
    rows = []
    for s, db, bright in CLACKS:
        for trim, length in [(SNAP_DB, SNAP_S), (0, CLACK_S)]:
            rows.append((s, db + trim, db + bright + trim, length))
    clacks = cracks(rows, [CLACK, TICK], trims_db=[-.5, -2.2], ragged_db=1.2, ripple_db=2.0, rise=0.018)
    return clacks + scrape


def food_bin():
    """Struck and rubbed hollow body: the bin booms, drums, judders and groans, and its rim clacks."""
    body = bin_judder() + bin_knocks() + bin_groans()
    return room(body, wet_db=-9) + room(rim_clacks(), wet_db=-9.5)


def sliding_kibble():
    """Granular flow: avalanches stir up a rattle, and pieces knock onto the heap, which hums in the bowl."""
    flow = swell(*POUR_SPAN_S, POUR_DB, POUR_RISE_S, POUR_FALL_S)
    flow *= np.arange(N) / SR > SLIPS[0][0]  # opened by the first avalanche
    stir_power = sum(swell(s, s, db + STIR_DB, length, SETTLE_S) ** 2 for s, db, length in SLIPS)
    stir = np.sqrt(stir_power + (amp(-8.5) * flow) ** 2)
    rattle = pellets(FALLING_SPAN_S, low_hz=2300, high_hz=11000, ring_s=.0016, spread_db=20, count=800)
    dust = amp(-6) * evened(coloured(grains(per_s=400, spread_db=4), TICK, ripple_db=2))
    knocks = pellets(FALLING_SPAN_S, low_hz=520, high_hz=1600, ring_s=.003, spread_db=16, count=220)
    heap = np.zeros((2, N))
    for _ in range(3):  # three patches with chance resonances of their own
        patch = coloured(grains(per_s=260, spread_db=0.75), HEAP, ripple_db=2.0)
        heap += amp(-6.0) * evened(patch)
    landing = sum(swell(s, s, db + LANDING_DB, length, 0.02) for s, db, _, length in DROPS)
    loose = amp(-4.5) * (rattle + dust) * stir
    landed = (amp(-1.0) * heap + amp(-8.5) * knocks) * np.hypot(flow, landing)
    return ports(loose + landed)


def scoop_clicks():
    """Impact bursts: single pieces and small avalanches strike the scoop wall."""
    drops = [(s, db, db + bright, length) for s, db, bright, length in DROPS]
    slips = [(s, db + SLIP_RING_DB, db, length) for s, db, length in SLIPS]
    clicks = cracks(drops, [SCOOP, TICK], trims_db=[-.3, .2], ragged_db=3.0, ripple_db=2.5, rise=0.1)
    clicks += cracks(slips, [SCOOP, TICK], trims_db=[-.3, -.3], ragged_db=4.0, ripple_db=3, rise=0.1,
                     count=70)
    return clicks


def pouring():
    """Granular impacts on a resonator: kibble slides and clicks, rings the scoop wall; the scoop taps the rim."""
    slide, clicks = sliding_kibble(), scoop_clicks()
    taps = cracks(RIM_TAPS, [SCOOP, RIM], trims_db=[-.3, .2], ragged_db=2.0, ripple_db=1.5, rise=0.2)
    wall = ring(SCOOP_MODES, contact=0.00022, size=4000)
    ringing = amp(-22) * resonated(clicks + slide, wall)
    return room(slide, wet_db=-7.0) + room(clicks + taps, wet_db=-15.5) + ringing


def scene():
    """Superposition of all sources."""
    surroundings = background() + rubbing() + clinking()
    dog = sniffing() + licking() + biting()
    return surroundings + dog + carrying() + patting() + food_bin() + pouring()


def record(dry):
    """Band limitation: the small microphone loses the deepest bass; then the treble is cut."""
    thin = signal.sosfilt(signal.butter(2, 38, "high", fs=SR, output="sos"), dry)
    lowpass = signal.firwin(511, EDGE_HZ, window=("kaiser", 9), fs=SR)
    return signal.oaconvolve(thin, lowpass[None], "same")


dry = scene()
out = record(dry)
master_out(out)
```